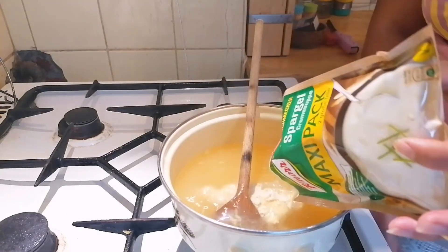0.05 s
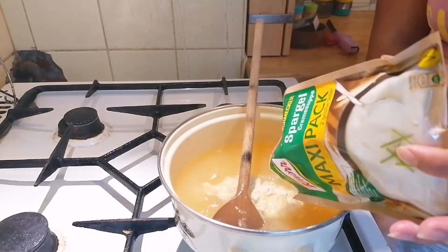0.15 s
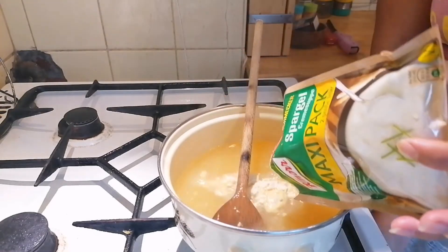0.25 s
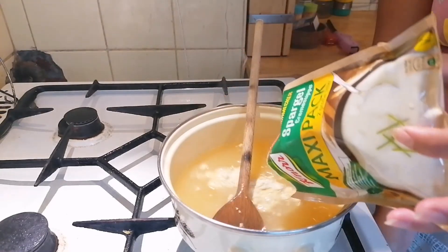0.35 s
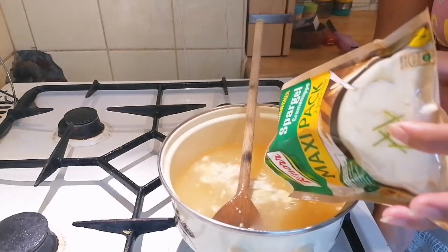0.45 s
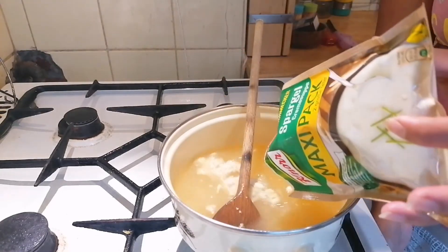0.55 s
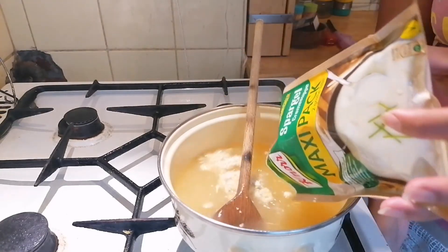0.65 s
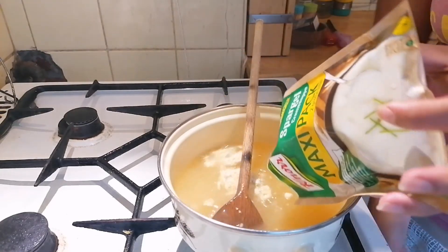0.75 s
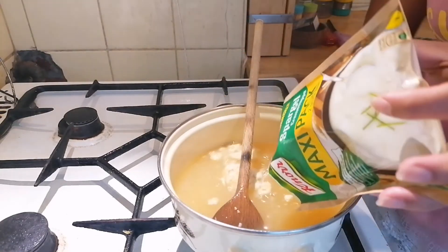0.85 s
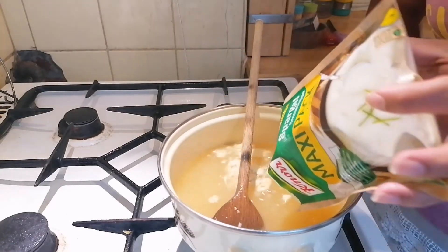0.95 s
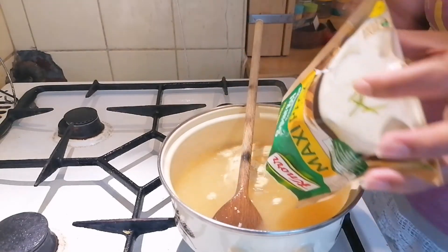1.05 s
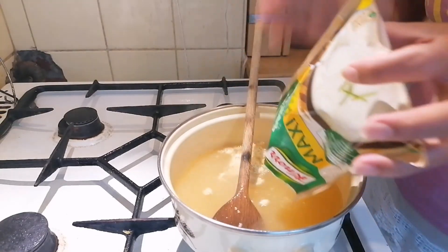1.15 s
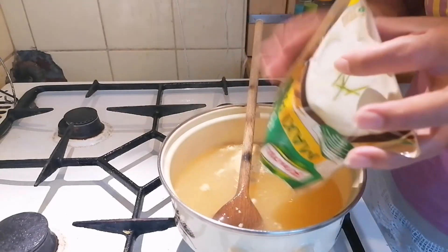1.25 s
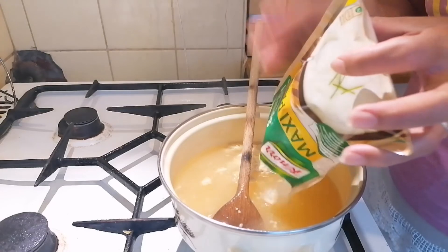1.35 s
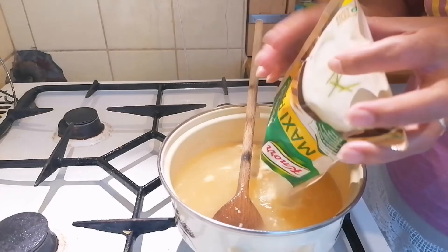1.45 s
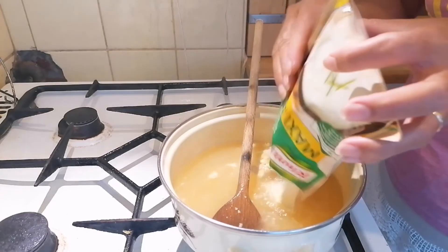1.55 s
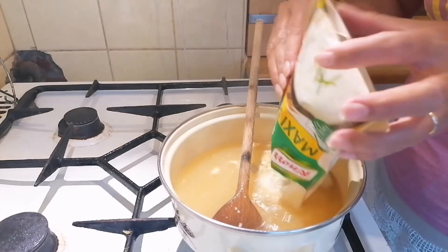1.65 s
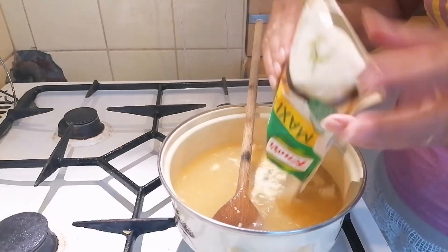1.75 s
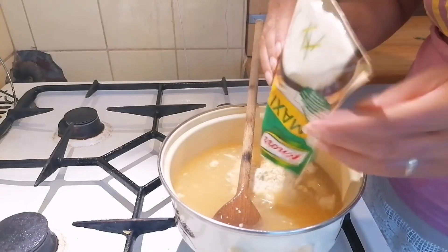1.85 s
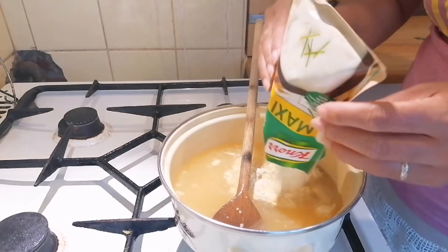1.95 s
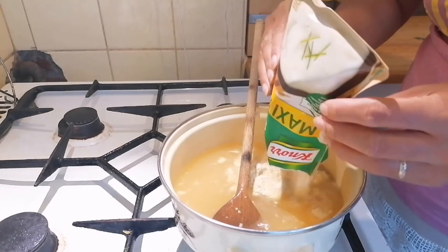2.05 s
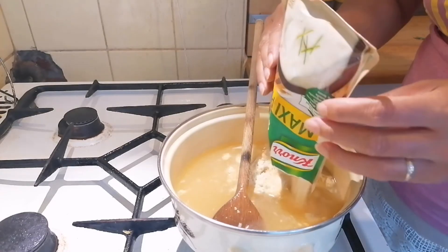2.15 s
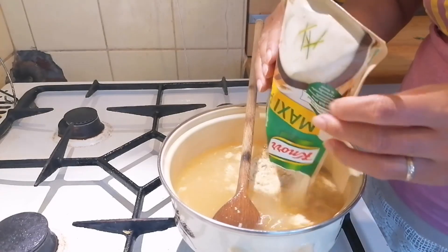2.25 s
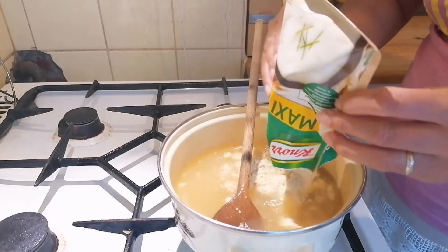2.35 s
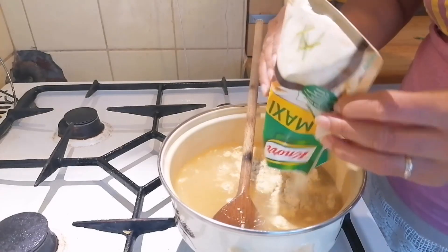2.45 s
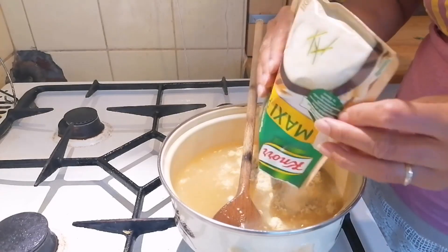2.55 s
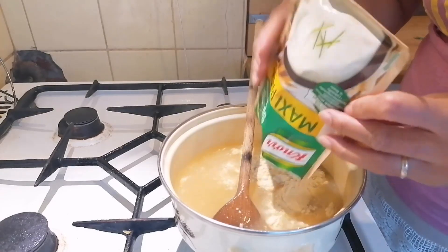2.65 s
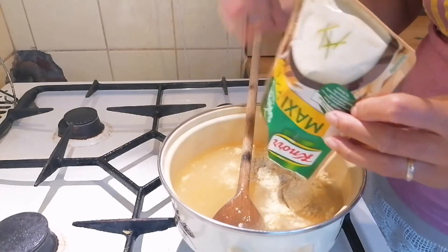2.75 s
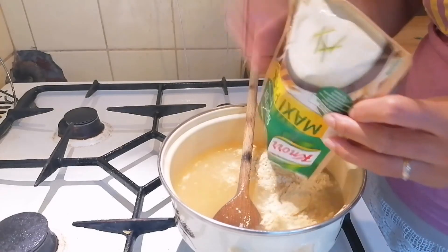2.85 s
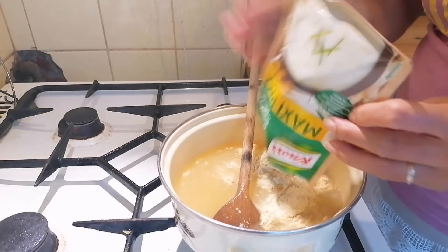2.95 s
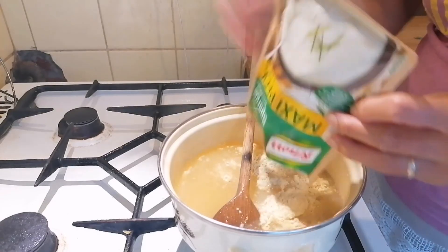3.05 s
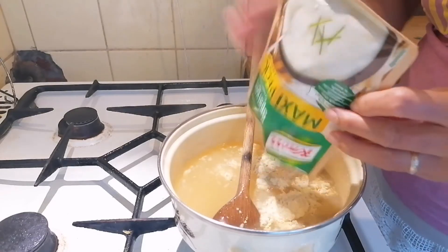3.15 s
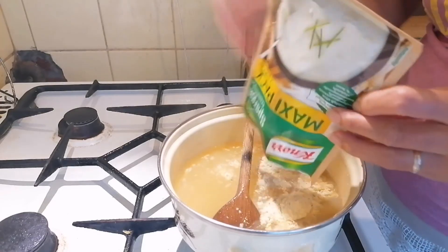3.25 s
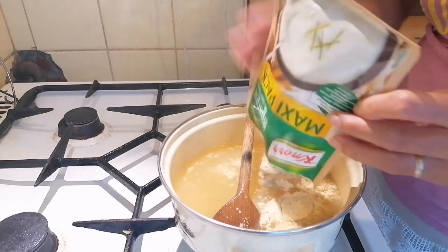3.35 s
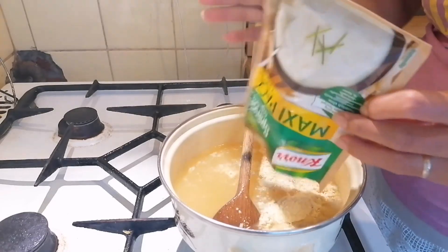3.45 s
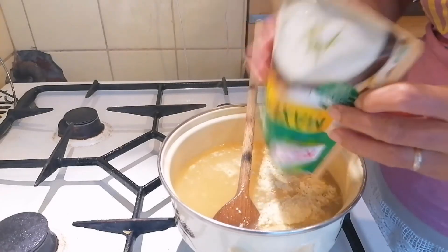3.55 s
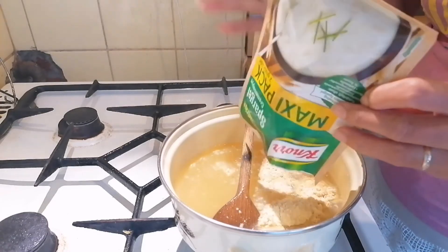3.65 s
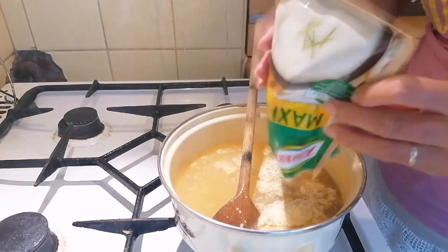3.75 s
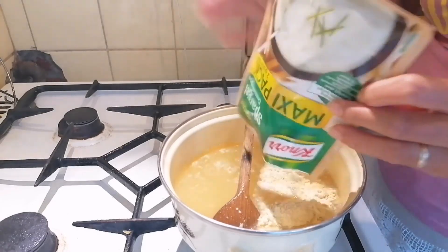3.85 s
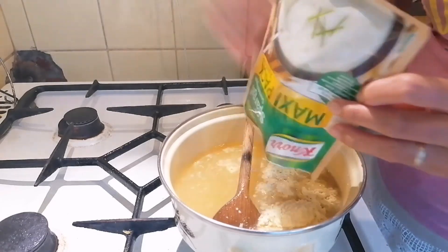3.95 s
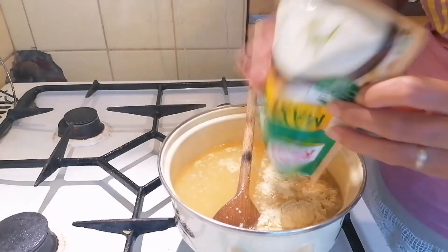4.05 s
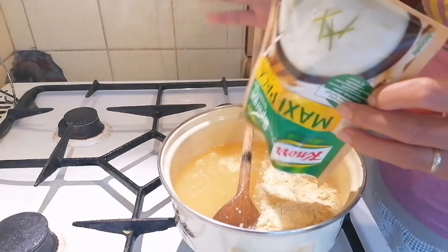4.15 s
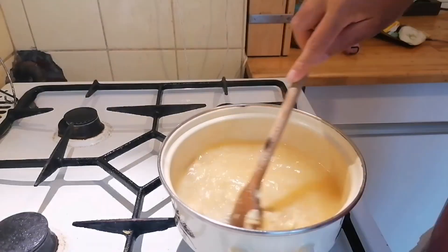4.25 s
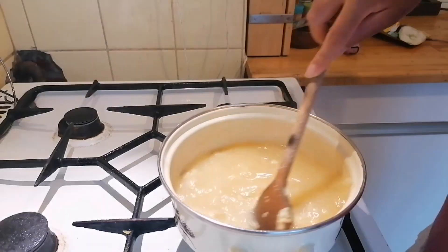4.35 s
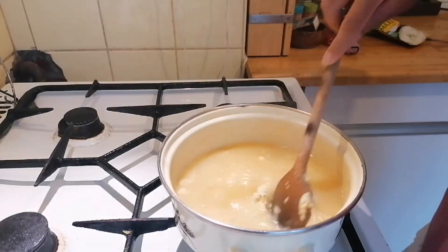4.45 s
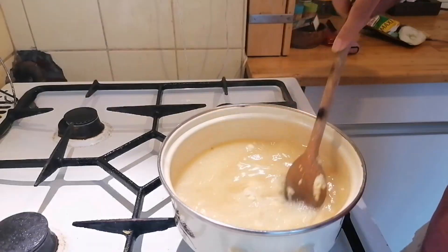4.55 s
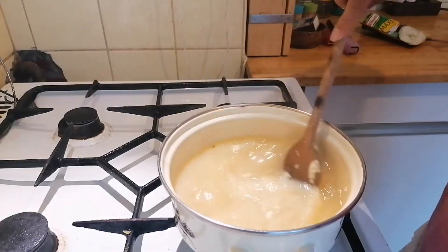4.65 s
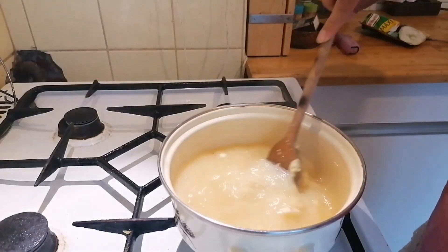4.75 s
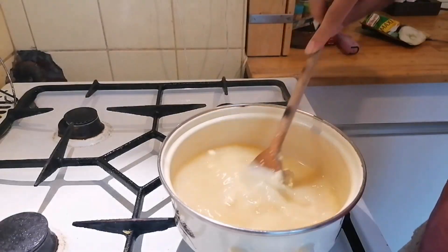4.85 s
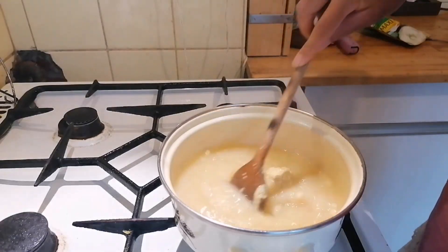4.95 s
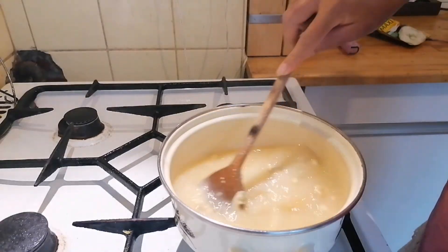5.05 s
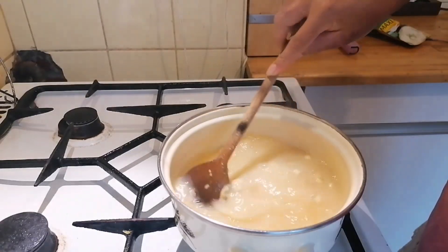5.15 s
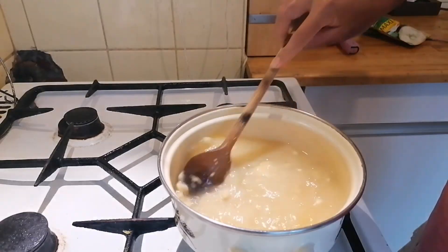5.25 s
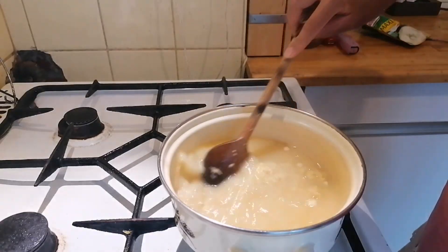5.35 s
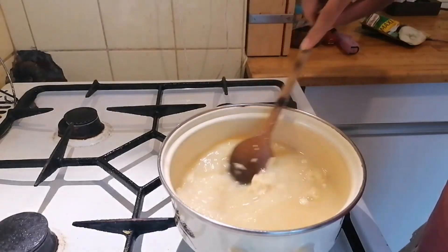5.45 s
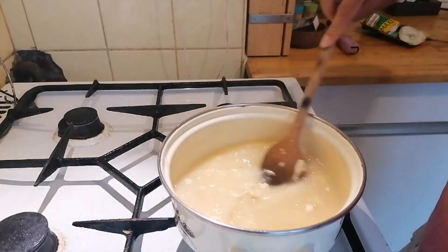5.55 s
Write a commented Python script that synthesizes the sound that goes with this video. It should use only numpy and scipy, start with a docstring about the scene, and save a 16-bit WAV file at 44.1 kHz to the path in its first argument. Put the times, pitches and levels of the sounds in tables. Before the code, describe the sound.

In a small tiled kitchen, powder slides softly from a plastic packet and lumps drop into a pot of soup. The packet rustles and snaps as it is shaken, then a palm gives it six sharp, evenly spaced slaps. The sound cuts abruptly to a quieter wooden spoon stirring, scraping and knocking on the pot. It is heard close, in stereo, over faint room noise and a low rumble.

```python
"""Packet soup in a small tiled kitchen

Powder slides from a plastic packet into a pot. The film rustles and snaps as a hand shakes it, and a
palm slaps it empty. Then the sound cuts to a wooden spoon that stirs, scrapes and knocks on the pot.
Two microphones hear it all, over room noise, a low rumble and faint electrical tones."""
import sys
import numpy as np
from scipy import signal
from scipy.fft import rfft, irfft
from scipy.io import wavfile
from scipy.ndimage import uniform_filter1d

SR = 44100
rng = np.random.default_rng(int(sys.argv[2]) if len(sys.argv) > 2 else 0)


def to_wav(sig):
    """Store sig (one row per channel, or 1-D mono) as 16-bit WAV at the path in sys.argv[1].

    Samples outside -1..1 are clipped; the rate is SR.
    """
    pcm = np.clip(np.atleast_2d(sig), -1, 1) * 32767
    pcm = np.round(pcm).astype(np.int16)
    wavfile.write(sys.argv[1], SR, pcm.T)  # frames by channels


N = 247401
CUT_S = 4.288  # the packet stops here and the spoon takes over

# The tone of the room noise. Each row: frequency in Hz, relative level in dB.
NOISE_COLOUR = [(24, -16.5), (40, -2.5), (54, -7.5), (174, -13), (317, -12.5), (669, -15.5), (739, -21.5),
                (797, -16), (4340, -24.5), (6630, -30.5), (15500, -40.5)]
# How alike that noise is left and right. Each row: frequency in Hz, likeness from -1 to 1.
NOISE_LIKENESS = [(60, 0.15), (240, 0.29), (950, -0.6), (3770, -0.55), (15000, -0.52)]
# The rumble. Each row: time in seconds, flutter level in dB, drone level in dB.
RUMBLE_LEVELS = [(0, -56, -75), (.14, -59, -68.5), (.36, -58.5, -75), (.5, -59, -52.5), (.64, -63, -54),
                 (.86, -59, -66.5), (1.03, -65.5, -68.5), (1.38, -70, -69.5), (1.5, -56, -60.5),
                 (1.7, -58, -63), (1.98, -65.5, -69.5), (2.3, -52.5, -66.5), (2.66, -69, -65.5),
                 (3.05, -54.5, -65), (3.4, -72, -67.5), (4.33, -66.5, -62.5), (4.5, -80, -66),
                 (4.85, -68, -74), (5.4, -65.5, -77), (5.61, -68, -78.5)]
# Electrical tones. Each row: pitch in Hz, typical level in dB.
ELECTRIC_TONES = [(100.5, -75), (689.1, -81), (6659, -93), (15068, -100)]
# The kitchen's echo. Each row: frequency in Hz, seconds to fade by 60 dB.
ECHO_TIMES = [(100, 0.44), (700, 0.32), (1840, 0.27), (4850, 0.3), (12000, .2)]
# Both microphones. Each row: frequency in Hz, gain in dB.
MIC_RESPONSE = [(8000, 0), (11000, -3), (13000, -11.5), (15500, -28)]
# The right microphone. Each row: frequency in Hz, lag in radians when facing is 1, gain in dB.
RIGHT_MIC = [(0, 1, 1.5), (400, -0.44, 1), (1250, 0.98, -2), (2000, -0.53, -0.5), (4150, -0.5, -2),
             (6030, -0.93, 0), (8200, -1.5, -7.5), (10090, -1.5, -1), (12300, -4, 5.5)]
# The pot and the hollow pouch ring. Each row: pitch in Hz, width in Hz, relative level in dB.
POT_RINGS = [(1480, 80, 2), (1930, 210, -10), (3650, 61, -4), (4750, 57, -6), (5710, 53, -8)]
POUCH_RINGS = [(456, 44, -23), (1056, 110, -0.5), (1332, 67, 10), (1803, 310, 6), (2580, 690, -2.5)]
# The tone of the plastic film. Each row: frequency in Hz, relative level in dB.
FILM_COLOUR = [(150, -28.5), (250, -1.5), (398, -4.5), (704, -2), (781, -5), (961, -4), (1510, -8),
               (2950, -5.5), (9220, -19.5), (11300, -24.5), (15500, -49)]
# Where the packet is held. Each row: time in seconds, dB louder on the left.
PACKET_PAN = [(0.5, 6), (1.4, 0.5), (2.6, -1), (3.3, -3), (4.2, 3)]
# The spoon drags on the pot bottom. Each row: start in seconds, hold in seconds, strength in dB.
SPOON_DRAGS = [(4.527, 0.19, -82), (5.097, 0.062, -69.5)]
# Three kinds of rubbing. Each row: start in seconds, hold in seconds, level in dB,
# then treble and body in dB compared with that level.
SPOON_SWEEPS = [(4.278, .02, -62.5, -8, 3.5), (4.52, 0.27, -69.5, -3.5, 5.5), (5.1, 0.095, -70, -6.5, 2.5),
                (5.19, 0.025, -61.5, -5, -5), (5.5, 0.015, -73, 6.5, -12)]
POWDER_SLIDES = [(0, .19, -65.5, 1.5, -8.5), (.44, 0.17, -68.5, -10, 7.5), (.565, 0.01, -56, 5.5, -11),
                 (.92, 0.094, -79.5, -14, 7.5)]
HAND_SQUEEZES = [(1.402, .055, -48, -5, -13), (1.495, .055, -49, -1, -23), (1.58, 0.038, -46.5, 0, -0.5),
                 (1.705, .04, -49, -2.5, -12), (1.755, .125, -44, -8, -16), (1.89, 0.091, -56.5, 2, -26),
                 (2.055, 0.1, -47, -1.5, -10), (2.245, 0.023, -60.5, 3, -10),
                 (2.295, .11, -50.5, -4.5, -8.5), (2.52, 0.27, -52, -4, -25),
                 (2.725, 0.032, -52.5, -24, -1.5), (3.21, .06, -65.5, 5.5, -12)]
# Six kinds of short sound. Each row: start in seconds, peak in dB, ring pitch in Hz,
# treble in dB compared with the ring.
SPOON_KNOCKS = [(4.316, -43, 1045, -17), (4.398, -54.5, 981, -18.5), (4.543, -46.5, 1780, -10),
                (4.678, -49.5, 1820, -16), (4.74, -50.5, 1750, -23), (4.76, -45, 900, -12),
                (5.022, -64, 2390, -14), (5.04, -60.5, 6200, -5), (5.164, -50.5, 1280, -7.5),
                (5.223, -52, 3520, 0), (5.287, -51.5, 7460, 1.5), (5.498, -56, 3500, -4),
                (5.525, -47, 1810, 0), (5.596, -32, 1730, -17)]
RIM_PINGS = [(4.838, -54, 2610, -12), (5.126, -57, 1510, -6.5), (5.332, -52.5, 2250, -20.5)]
LUMP_LANDINGS = [(.024, -40.5, 2960, -2), (.05, -53, 1950, -15), (.077, -47.5, 2150, -21),
                 (.105, -55, 2250, -15), (.148, -51, 1290, -12), (.165, -49, 2160, -18),
                 (.18, -54.5, 1310, -14), (.217, -53.5, 2200, -14)]
FINGER_SQUEAKS = [(0.571, -52, 4200, -4), (0.577, -54, 3300, -5), (0.699, -64, 4000, -20),
                  (0.761, -65, 3570, -20)]
SOFT_BUMP = [(.925, -53, 188, -30)]
CREASE_SNAPS = [(0.573, -49, 4400, 2), (1.407, -34.5, 1510, -4), (1.439, -42, 1800, -7),
                (1.466, -51, 1890, -20), (1.493, -33.5, 1400, -12), (1.533, -36, 1360, -20),
                (1.581, -37, 1730, 4.5), (1.591, -19, 1290, -23), (1.76, -26.5, 724, -27),
                (1.792, -20, 1240, -24), (1.794, -32.5, 3200, -23), (1.824, -16.5, 1210, -28),
                (1.839, -22, 1220, -3), (1.851, -12.5, 1850, -26), (1.856, -22, 720, 2),
                (1.871, -20, 2110, 5.5), (1.88, -47, 860, -16), (1.938, -50.5, 700, -20),
                (2.063, -39, 1480, -13), (2.088, -41.5, 750, -20), (2.122, -51, 710, -20),
                (2.172, -38.5, 500, -10), (2.297, -43.5, 650, -13), (2.342, -21.5, 1800, -11.5),
                (2.515, -29.5, 710, -22), (2.519, -26.5, 1690, -16), (2.534, -50, 764, -16),
                (2.585, -16, 1430, -1.5), (2.677, -47, 1050, -18), (2.733, -24.5, 2000, -0.5),
                (2.766, -35, 2500, 0.5), (2.829, -43.5, 600, -15.5), (2.98, -48, 600, -17),
                (3.093, -13.5, 1540, -26), (3.11, -22, 790, 3), (3.302, -12.5, 1420, -1),
                (3.307, -23, 1720, -14.5), (3.502, -14, 2230, -15), (3.507, -14, 1830, -10),
                (3.515, -18, 1850, -1.5), (3.743, -12.5, 1520, -36), (3.748, -24, 1290, -1),
                (3.968, -20, 1100, 7), (3.972, -26, 1280, -26), (4.205, -12.5, 1370, -24.5),
                (4.262, -27, 1335, -26.5), (4.273, -26, 1140, -8)]
# The palm hits the packet. Each row: start in seconds, air push strength in dB, push pitch in Hz,
# crumple strength in dB, treble in dB compared with the crumple.
PALM_SLAPS = [(1.406, -36.5, 144, -37, -1.5), (1.581, -29, 141, -29.5, 1), (1.756, -37, 146, -31.5, -4),
              (3.085, -26.5, 105, -21, -2), (3.296, -26, 105.6, -18.5, 0), (3.498, -23, 113, -20.5, -5.5),
              (3.737, -22.5, 116, -19, -0.5), (3.963, -24.5, 120, -18.5, -2), (4.196, -24.5, 124, -20, 3.5)]


def amp(db):
    """Turn decibels into a multiplier."""
    return 10 ** (np.asarray(db) / 20)


def evened(x):
    """Scale a sound to an average power of 1."""
    return x / np.sqrt(np.mean(x ** 2) + 1e-20)


def read(points, hz):
    """Look up a value between a table's frequencies."""
    f, value = np.transpose(points)
    return np.interp(np.log(hz + 1), np.log(f + 1), value)


def add(mix, s, sound):
    """Mix a sound in, starting at s seconds."""
    part = mix[..., round(s * SR):][..., :sound.shape[-1]]
    part += sound[..., :part.shape[-1]]


def band(x, lo_hz, hi_hz):
    """Keep what lies between two frequencies."""
    return signal.sosfilt(signal.butter(2, [lo_hz, hi_hz], "bandpass", fs=SR, output="sos"), x)


def resonate(x, hz, width):
    """Ring at one pitch; a narrow width rings longer."""
    r = np.exp(-np.pi * width / SR)
    return signal.lfilter([1 - r, 0, r - 1], [1, -2 * r * np.cos(2 * np.pi * hz / SR), r * r], x)


def panned(x, pan_db):
    """Make the left side pan_db louder than the right."""
    return x * amp(np.array([[1], [-1]]) * pan_db / 2)


def stroke(start, hold, rise, fall_db_per_s):
    """One movement: it rises, holds and dies away."""
    t = np.arange(N) / SR - start
    return np.clip(t / rise, 0, 1) * amp(-fall_db_per_s * np.maximum(t - rise - hold, 0))


def crackle(length, per_s, spread_db, hiss):
    """Tiny clicks of uneven size over a bed of hiss."""
    chance, size = rng.random(length), rng.exponential(1, length)
    sign, noise = rng.standard_normal((2, length))
    ticks = (chance < per_s / SR) * np.sign(sign) * amp(spread_db * np.minimum(size, 4))
    return evened(evened(ticks) + hiss * noise)


def clicks(rows, pan, per_s, sharpness, fade_s, body_db, widen=0):
    """Each blow is a dying crackle with a ring, a dull body an octave down and a bright edge."""
    out, t = np.zeros((2, N)), np.arange(6000) / SR
    fade = (amp(-60 * t / fade_s) + 0.71 * amp(-60 * t / 0.0033)) * np.minimum(t / 0.00019, 1)
    for s, db, hz, treble_db in rows:
        a, b = (crackle(len(t), per_s, spread_db=4, hiss=1) for _ in range(2))
        burst = np.array([a, 0.78 * a + 0.6 * b]) * fade
        width = hz / sharpness * (hz / 1000) ** widen
        ring = resonate(resonate(burst, hz, width), hz, 2 * hz)
        edge, body = band(burst, 2800, 10000), band(burst, 0.33 * hz, 0.68 * hz)
        ring, edge, body = (x / abs(x).max() for x in (ring, edge, body))
        sound = ring + amp(treble_db) * edge + amp(body_db) * body
        add(out, s, panned(amp(db) * sound, np.interp(s, *np.transpose(pan))))
    return out


def friction(rows, rise_s, fall_db_per_s, rest_db, span_s,
             per_s, spread_db, pan_db, surge_db, hiss, top_db):
    """Rubbing makes a dense crackle that follows the motion; four bands of it swell unevenly."""
    rest = amp(rest_db) * stroke(span_s[0], span_s[1] - span_s[0], .01, 400)  # faint, between moves
    moves = [amp([[db], [db + treble_db], [db + body_db]]) * stroke(s, hold, rise_s, fall_db_per_s)
             for s, hold, db, treble_db, body_db in rows]
    level, treble, body = np.sqrt(rest ** 2 + sum(m ** 2 for m in moves))
    a, b = (crackle(N, per_s, spread_db, hiss) for _ in range(2))
    grains = np.array([a, 1.24 * a + 1.03 * b])
    slow = uniform_filter1d(uniform_filter1d(rng.standard_normal((5, N)), 400), 400)
    surges = amp(surge_db * evened(slow[0] + slow[1:]))
    bands = [(body, 282, 1190), (level, 730, 3140), (treble, 2280, 7600),
             (amp(top_db) * treble, 5640, 12360)]
    sound = sum(gain * surge * evened(band(grains, lo, hi))
                for (gain, lo, hi), surge in zip(bands, surges))
    return panned(sound, pan_db)


def room_noise(level_db=-67.5):
    """Room and microphone noise, partly shared by left and right."""
    frames, hz = N // 256 + 5, np.fft.rfftfreq(1024, 1 / SR)
    a, b, c, d, flicker = rng.standard_normal((frames, 513, 5)).T
    flicker = evened(uniform_filter1d(uniform_filter1d(flicker, 12, 0), 14, 1))
    same = read(NOISE_LIKENESS, hz)[:, None]
    left = a + 1j * b
    right = same * left + np.sqrt(1 - same ** 2) * (c + 1j * d)
    spectrum = np.array([left, right]) * amp(read(NOISE_COLOUR, hz)[:, None] + 2.1 * flicker)
    noise = signal.istft(spectrum, nperseg=1024, noverlap=768)[1][:, :N]
    return amp(level_db) * noise / np.std(band(noise, 150, 15000))


def rumble():
    """A deep flutter and a low drone that lean left before the cut and right after it."""
    s, flutter_db, drone_db = np.transpose(RUMBLE_LEVELS)
    t, noise = np.arange(N) / SR, rng.standard_normal((3, N))
    noise = panned(noise[0] + .5 * noise[1:], np.where(t < CUT_S, 3.5, -3))
    flutter, drone = evened(band(band(noise, 9.2, 37), 5, 45)), evened(band(noise, 65, 170))
    return amp(np.interp(t, s, flutter_db)) * flutter + amp(np.interp(t, s, drone_db)) * drone


def electric_tones():
    """Faint tones of steady pitch that waver in strength."""
    t, out = np.arange(N) / SR, np.zeros(N)
    for hz, db in ELECTRIC_TONES:
        waver = amp(5.1 * evened(uniform_filter1d(rng.standard_normal(N), 3000)))
        out += np.sqrt(2) * amp(db) * waver * np.sin(2 * np.pi * hz * t)
    return out


def kitchen(x, echo_db=-5):
    """Sound bounces off the tiles, and each frequency fades at its own speed."""
    bounces = np.zeros((2, SR // 2))
    at = np.arange(100, SR // 2 - 20, 20) + rng.integers(0, 20, (2, (SR // 2 - 101) // 20))
    np.put_along_axis(bounces, at, rng.choice([-1., 1.], at.shape), 1)
    hz, t, spectrum = signal.stft(bounces, SR, nperseg=256)
    spectrum[1, hz < 450] = spectrum[0, hz < 450]  # long waves reach both sides alike
    fade = amp(-60 * t / read(ECHO_TIMES, hz)[:, None] - 5.9 * (hz[:, None] < 260))
    tail = signal.istft(spectrum * fade, SR, nperseg=256)[1]
    return x + amp(echo_db) * signal.fftconvolve(x, tail / np.linalg.norm(tail[0]), axes=1)[:, :N]


def microphones(x, facing):
    """Both lose the top octave; the right one hears the waves shifted in timing and strength."""
    hz, spectrum = np.fft.rfftfreq(N + 999, 1 / SR), rfft(x, N + 999)
    f, lag, db = np.transpose(RIGHT_MIC)
    spectrum[1] *= amp(np.interp(hz, f, db)) * np.exp(-1j * facing * np.interp(hz, f, lag))
    return irfft(spectrum * amp(read(MIC_RESPONSE, hz)), N + 999)[:, :N]


def scrape():
    """The wooden edge drags on the pot and keeps it ringing."""
    motion = sum(amp(db) * stroke(s, hold, 0.038, 180) for s, hold, db in SPOON_DRAGS)
    drag = motion * crackle(N, 1800, spread_db=7, hiss=0.75)
    rings = sum(amp(db) * evened(resonate(drag, hz, width)) for hz, width, db in POT_RINGS)
    return panned(rings * np.std(drag), -1)


def stirring():
    """The spoon sweeps through the soup, scrapes and knocks; the pot's rim rings thinly."""
    sweeps = friction(SPOON_SWEEPS, rise_s=0.02, fall_db_per_s=180, rest_db=-79.5, span_s=(4.29, 5.61),
                      per_s=4500, spread_db=5, pan_db=-1, surge_db=2, hiss=0.92, top_db=-4)
    scrapes = scrape()
    knocks = clicks(SPOON_KNOCKS, [(0, -8.5)], 1500, sharpness=7.8, fade_s=0.027, body_db=-24)
    pings = clicks(RIM_PINGS, [(0, -11)], 1500, sharpness=37, fade_s=0.025, body_db=-23)
    return sweeps + scrapes + knocks + pings


def pouring():
    """Powder slides, lumps land in the soup, film squeaks under the fingers; there is one soft bump."""
    powder = friction(POWDER_SLIDES, rise_s=0.005, fall_db_per_s=225, rest_db=-76, span_s=(0, 1.4),
                      per_s=4000, spread_db=2.5, pan_db=4, surge_db=2, hiss=0.84, top_db=-4.5)
    lumps = clicks(LUMP_LANDINGS, [(0, -.4)], 3400, sharpness=5.3, fade_s=0.051, body_db=-24)
    squeaks = clicks(FINGER_SQUEAKS, [(0, 2.5)], 2800, sharpness=25, fade_s=0.18, body_db=-22)
    bump = clicks(SOFT_BUMP, [(0, 5.2)], 2400, sharpness=7.2, fade_s=0.35, body_db=-24)
    return powder + lumps + squeaks + bump


def packet(x, ring_db=-1):
    """The film colours a sound, and the hollow pouch rings along."""
    hz = abs(np.fft.fftfreq(4096, 1 / SR))
    log_gain = np.log(amp(read(FILM_COLOUR, hz)))
    response = np.fft.ifft(np.exp(np.conj(signal.hilbert(log_gain)))).real[:2048]  # a filter 2048 taps long that answers at once, with no lead-in
    film = signal.oaconvolve(x, response[None] / np.linalg.norm(response), axes=1)[:, :N]
    return film + sum(amp(db + ring_db) * resonate(film, f, width) for f, width, db in POUCH_RINGS)


def shaking():
    """Creases buckle with a snap, and the squeezed film rustles."""
    snaps = clicks(CREASE_SNAPS, PACKET_PAN, 3300, sharpness=2.13, fade_s=0.038, body_db=-14.5, widen=.6)
    rustle = friction(HAND_SQUEEZES, rise_s=0.013, fall_db_per_s=230, rest_db=-78.5, span_s=(1.41, 2.95),
                      per_s=1500, spread_db=3.5, pan_db=4, surge_db=3, hiss=0.95, top_db=-6)
    return snaps + rustle


def slaps(rise_s=0.0094, fade_s=0.039):
    """The palm pushes air out of the pouch in a swing and a half; the film then crumples."""
    push, crumple, t = np.zeros(N), np.zeros((2, N)), np.arange(8000) / SR
    after = np.maximum(t - rise_s, 0)
    fall = amp(-60 * after / fade_s) + amp(-18.5 - 60 * after / 0.38)  # the film keeps settling
    swell = (0.21 + 0.52 * np.minimum(t / rise_s, 1) ** 2) * fall
    for s, push_db, hz, crumple_db, treble_db in PALM_SLAPS:
        turns = hz * t
        swing = np.sin(2 * np.pi * (turns + 0.15)) * np.minimum(t / 0.0012, 1)
        add(push, s, amp(push_db - 5.4 * turns ** 3) * swing)
        a, b = (crackle(len(t), 2500, spread_db=2, hiss=1) for _ in range(2))
        burst = amp(crumple_db) * swell * np.array([a, 0.62 * a + 0.47 * b])
        add(crumple, s, band(burst, 140, 5000) + amp(treble_db) * band(burst, 3110, 15000))
    return panned(push, 8) + panned(packet(crumple), 2.8)


def scene():
    """First the packet, then the spoon, over the background."""
    before_cut = np.clip((CUT_S - np.arange(N) / SR) / 0.0014, 0, 1)  # stops the packet's echo too
    emptying, spoon = slaps() + shaking() + pouring(), stirring()
    emptying = microphones(before_cut * kitchen(emptying), facing=1)
    spoon = microphones(kitchen(spoon), facing=-0.44)
    return emptying + spoon + room_noise() + rumble() + electric_tones()


def record(dry):
    """Remove the treble above 15500 Hz."""
    return signal.oaconvolve(dry, signal.firwin(511, 15500, window=("kaiser", 9), fs=SR)[None], "same")


dry = scene()
out = record(dry)
to_wav(out)
```